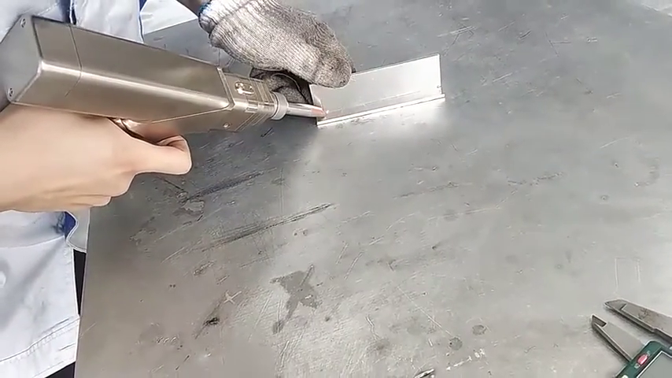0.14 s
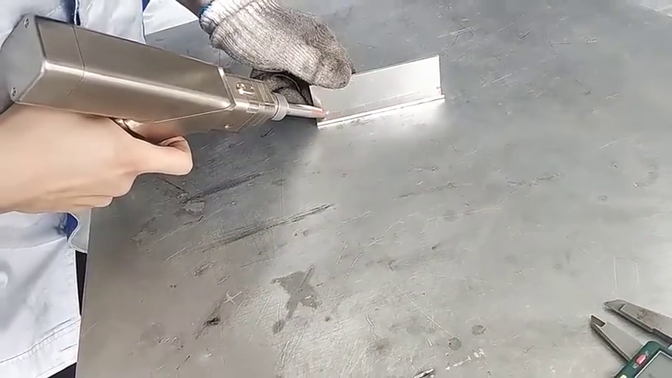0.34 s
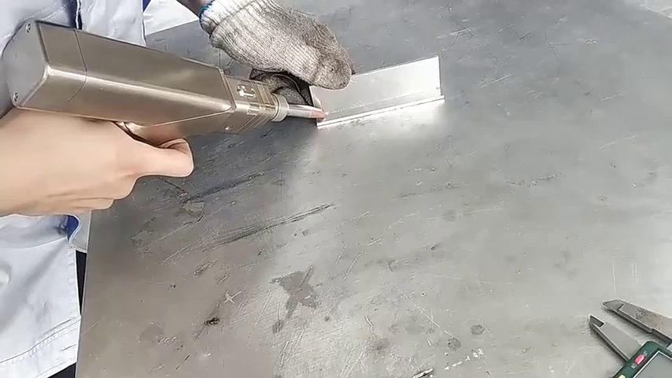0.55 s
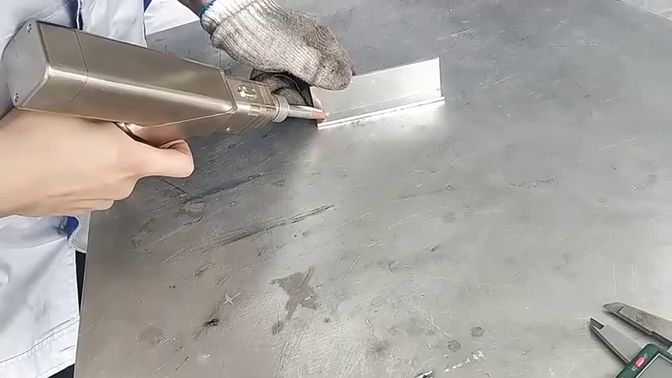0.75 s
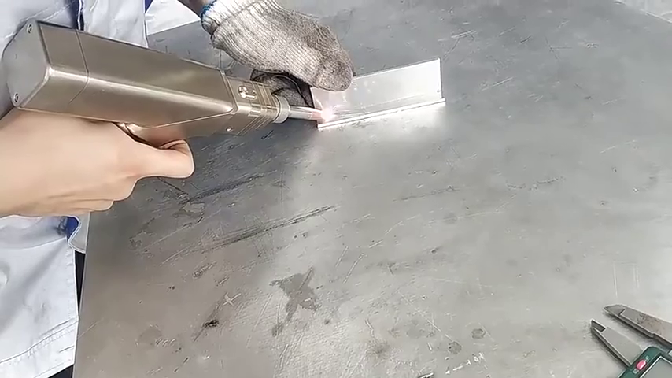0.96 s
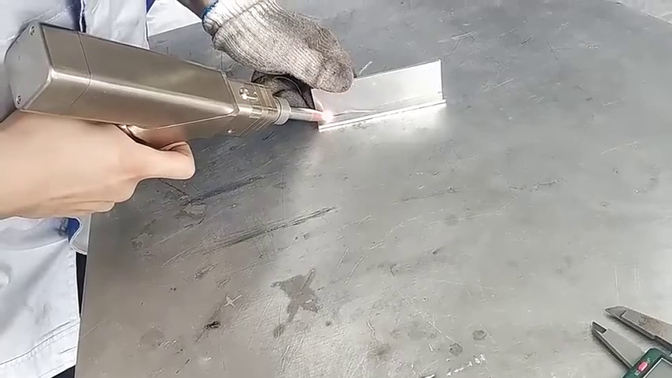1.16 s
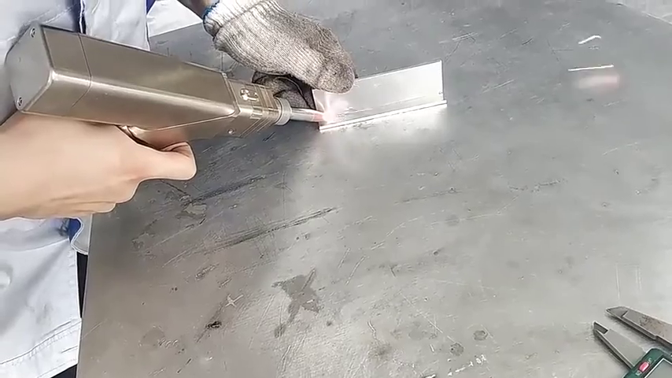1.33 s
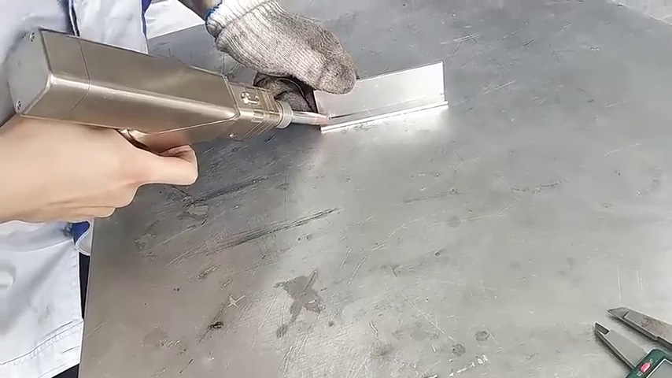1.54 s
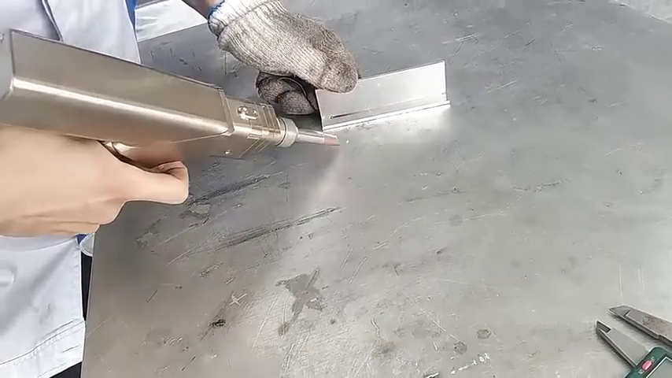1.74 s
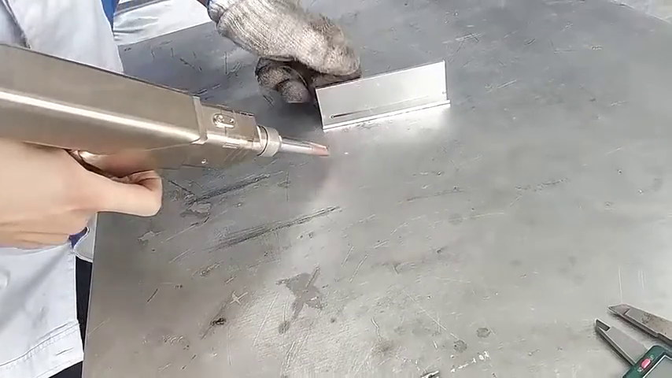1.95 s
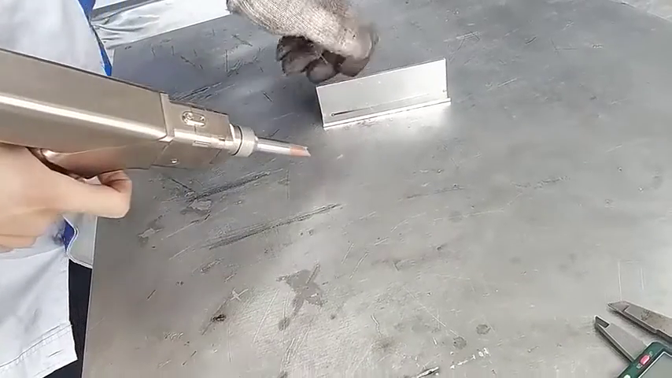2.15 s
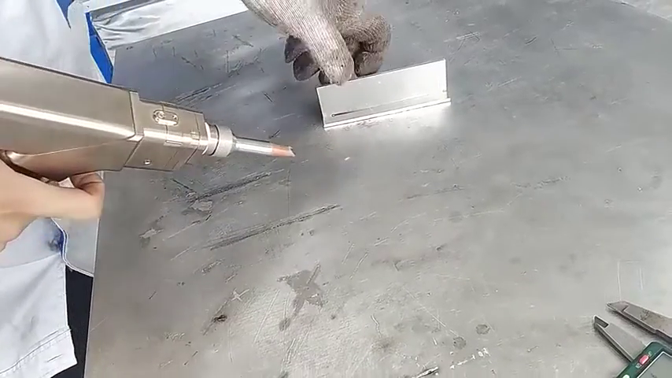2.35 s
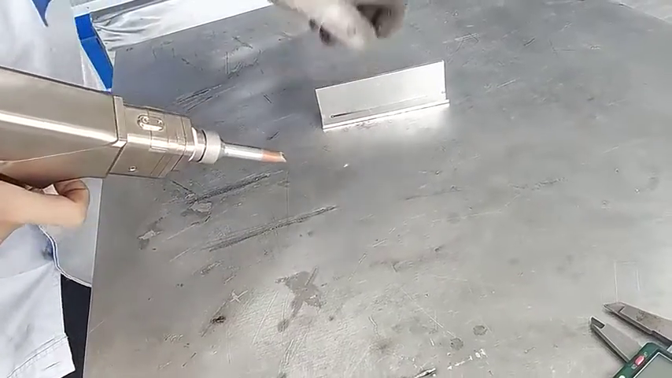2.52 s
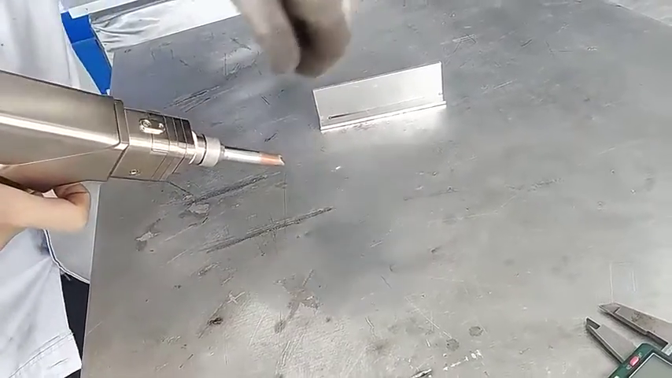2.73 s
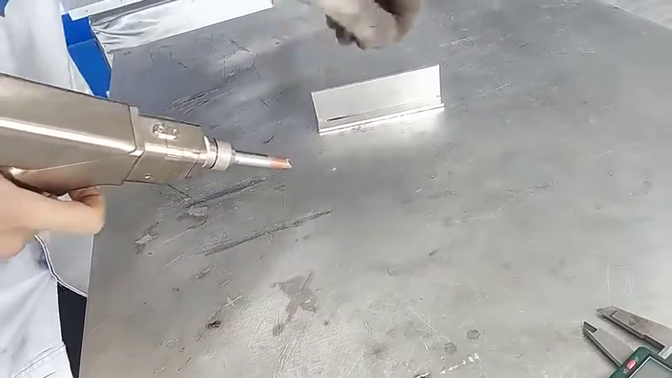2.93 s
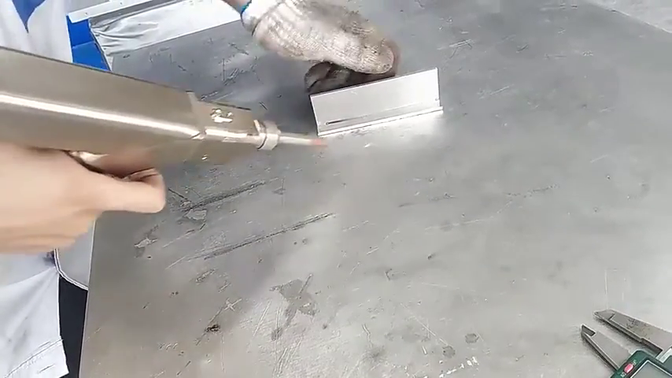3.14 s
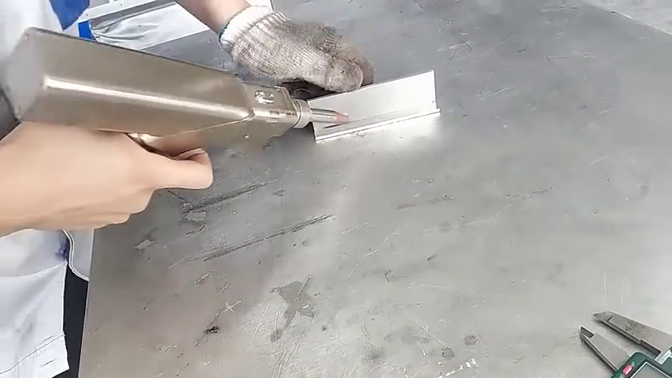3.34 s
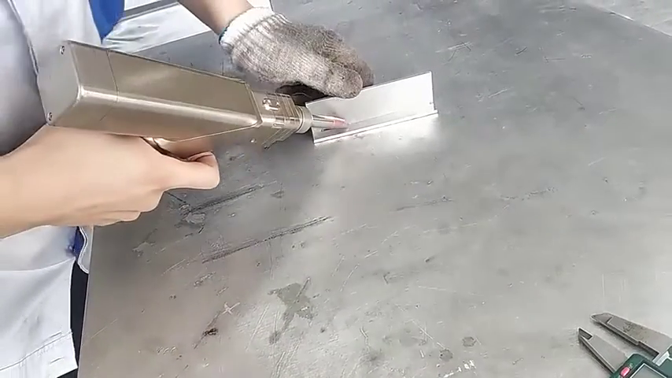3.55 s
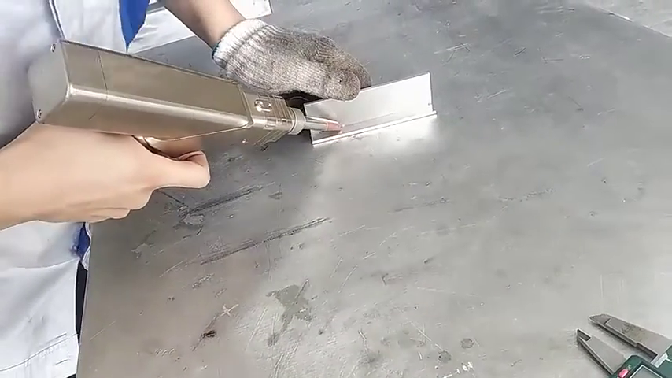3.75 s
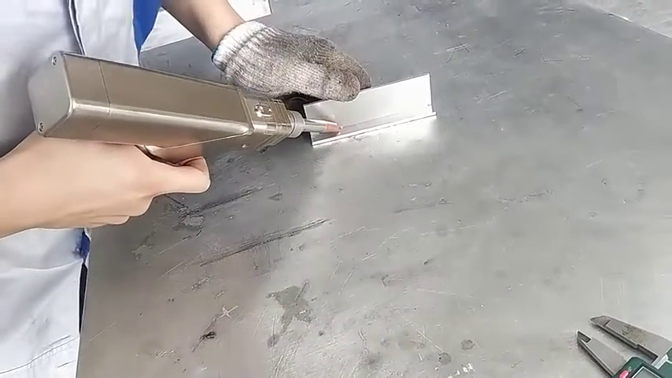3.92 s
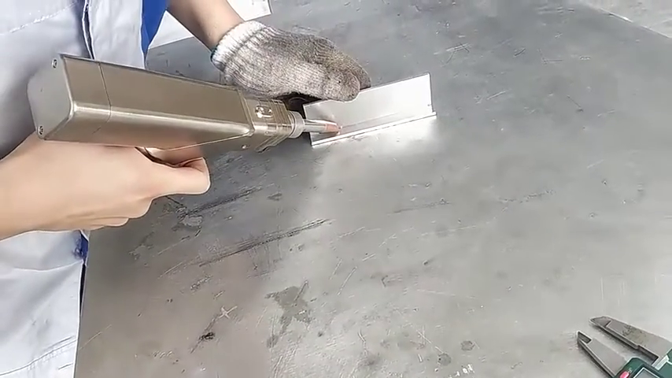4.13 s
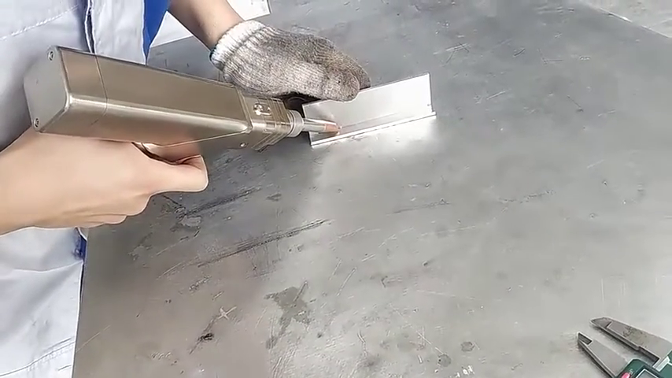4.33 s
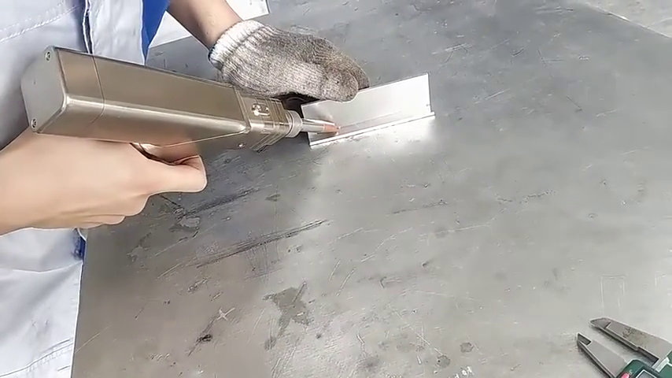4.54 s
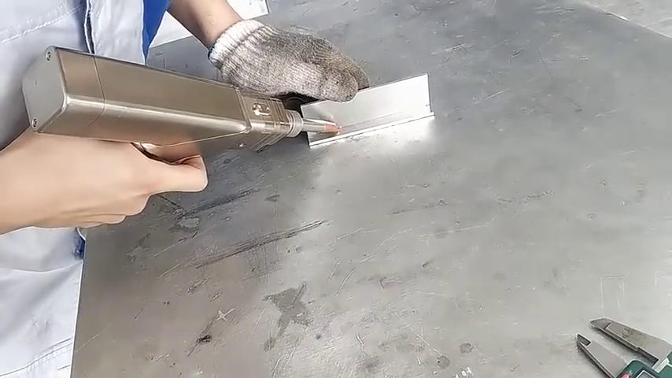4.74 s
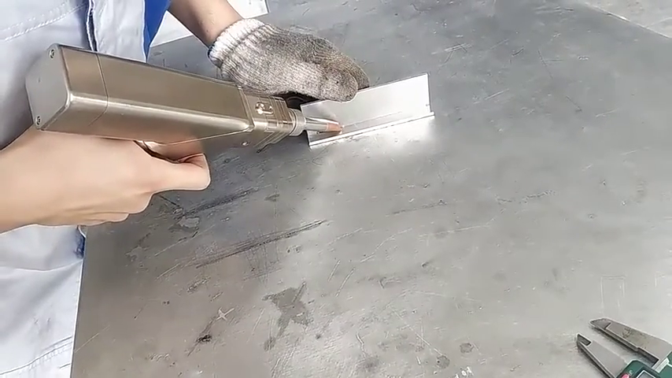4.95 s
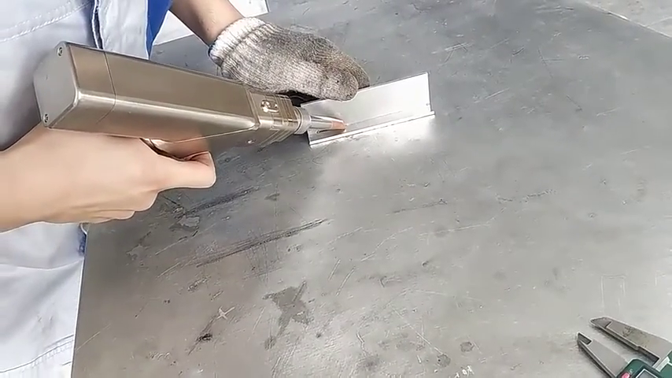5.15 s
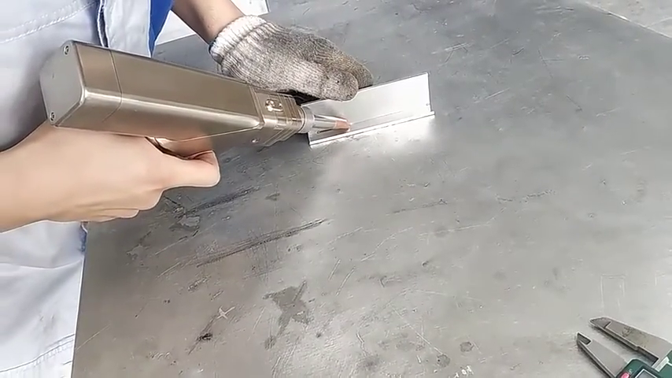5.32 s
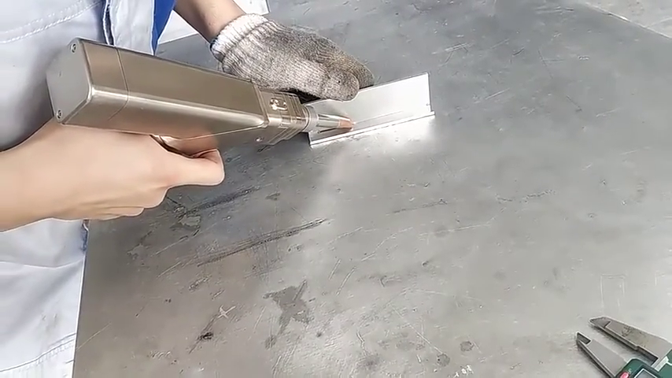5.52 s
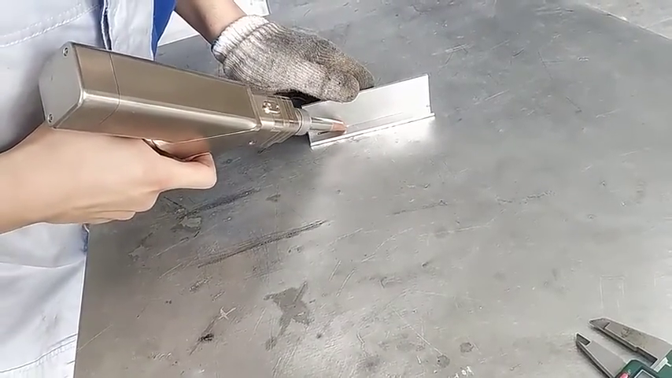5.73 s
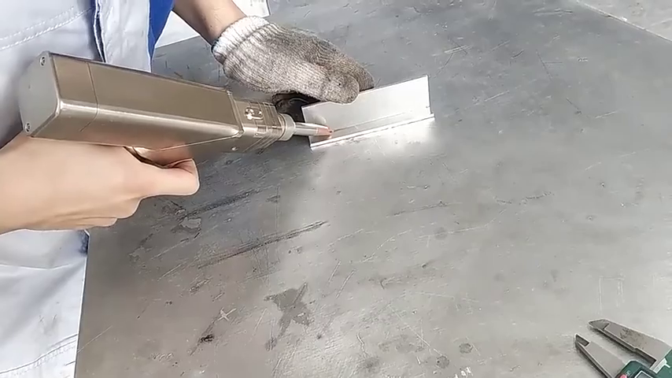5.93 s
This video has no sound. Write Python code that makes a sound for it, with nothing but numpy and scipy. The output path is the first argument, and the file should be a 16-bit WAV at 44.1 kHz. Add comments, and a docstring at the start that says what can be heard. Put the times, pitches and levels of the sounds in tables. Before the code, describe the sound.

Over a steady rumbling fan hum, a grinder rasps lightly, a sharp gas jet hisses briefly with a valve click, then grinding turns firm and choppy.

```python
"""Cooling fans rumble and hum throughout while a grinder further off rasps lightly over metal.
At 0.9 s the shielding gas of a handheld laser welder whistles and roars in a small steel angle, and a valve clicks.
The grinder then skips, knocks the work and goes over to firm strokes. Air, jet and disc are noise shaped by
resonances; hum, click and knocks are sinusoids, with a burst of noise in each knock.
A single microphone hears it all; only the treble flickers between the ears."""
import sys
import numpy as np
from scipy import signal
from scipy.fft import rfft, irfft, next_fast_len
from scipy.io import wavfile
from scipy.ndimage import uniform_filter1d, map_coordinates

SR = 44100
rng = np.random.default_rng(int(sys.argv[2]) if len(sys.argv) > 2 else 0)


def pcm_store(signal):
    """Save signal as 16-bit PCM."""
    levels = np.round(np.clip(np.atleast_2d(signal), -1, 1) * 32767)
    wavfile.write(sys.argv[1], SR, levels.astype(np.int16).T)


def amplitude_ratio(level_db):
    """Convert a level in decibels to the matching linear amplitude (field) ratio."""
    exponent = np.asarray(level_db, float) / 20
    return 10 ** exponent


N = 268128  # samples in the scene


def unit(x):
    """Normalization: a signal divided by its rms has rms 1."""
    return x / np.sqrt(np.mean(x ** 2) + 1e-20)


def along(points, hz):
    """Interpolation over log frequency, since pitch is heard by ratio; points are (Hz, value)."""
    f, v = np.transpose(points)
    return np.interp(np.log(hz + 1), np.log(f + 1), v)


def curves(rows):
    """Piecewise-linear envelopes, one per column after the time; far below hearing outside the rows."""
    s, *cols = np.transpose(rows)
    return [np.interp(np.arange(N) / SR, s, c, left=-120, right=-120) for c in cols]


def held(start, rise, hold, fade_db_per_s):
    """Steady excitation: the gain rises, holds, then decays exponentially for at most a second."""
    t = np.arange(N) / SR - start
    return np.clip(t / rise, 0, 1) * amplitude_ratio(-fade_db_per_s * np.clip(t - rise - hold, 0, 1))


def wobble(rate):
    """Slow random modulation: a smooth curve through random knots, rate knots a second."""
    knots = rng.standard_normal(int(N * rate / SR) + 4)
    return map_coordinates(knots, [np.arange(N) * rate / SR])


def filtered(x, response):
    """Linear filtering: the spectrum times a response of frequency."""
    m = next_fast_len(N + SR // 2)
    return irfft(rfft(x, m) * response(np.fft.rfftfreq(m, 1 / SR)), m)[..., :N]


def patchy(patchy_db):
    """Non-stationary noise: narrow bands ring up briefly, broad and slower patches come and go."""
    z = signal.stft(rng.standard_normal(N + 1024), nperseg=1024)[2]

    def field(tall, long):
        across = uniform_filter1d(rng.standard_normal(z.shape), size=tall, axis=0)
        return unit(uniform_filter1d(across, size=long, axis=1))

    gain_db = patchy_db * field(tall=2, long=5) + 1.1 * field(tall=14, long=7)
    return signal.istft(z * amplitude_ratio(gain_db), nperseg=1024)[1][:N]


def resonant(modes, patchy_db, steep=2):
    """Resonance filtering: noise of rms 1 has passed each resonance twice, so the skirts fall fast."""
    def power(f):
        return sum(amplitude_ratio(db) ** 2 / (1 + ((f * f - c * c) / (w * f + 1)) ** 2) ** steep
                   for c, w, db in modes)

    return unit(filtered(patchy(patchy_db), lambda f: np.sqrt(power(f))))


def gliding(rows, patchy_db):
    """Time-varying resonance: noise of steady rms 1 whose centre and width move."""
    hz, t, z = signal.stft(patchy(patchy_db), SR, nperseg=512)
    s, centre, width = np.transpose(rows)
    c, w, f = np.interp(t, s, centre), np.interp(t, s, width), hz[:, None]

    def bell(wide):
        return 1 / (1 + ((f * f - c * c) / (wide * f + 1)) ** 2) ** 2

    power = bell(w) + amplitude_ratio(-9) ** 2 * bell(c)  # a broad body lies under the resonance
    level = np.sqrt(power / power.mean(axis=0))
    return unit(signal.istft(z * level, SR, nperseg=512)[1][:N])


# Spectrum of the fan air. Each row: frequency in Hz, relative level in dB.
AIR_SPECTRUM = [(35, -48), (60, -11), (134, -12), (190, -4.5), (222, 1.5), (330, -3), (632, -9), (752, -11),
                (1210, -12.5), (1800, -12), (2200, -10), (2840, -9.5), (6510, -13.5), (9020, -11),
                (9850, -9.5), (10300, -36), (10900, -13), (11300, -32)]
# Wavering machine tones. Each row: frequency in Hz, mean level in dB rms.
HUM_TONES = [(199.7, -43.5), (230, -47), (287, -47), (600, -57)]


def fans():
    """Broadband flow noise with tones wavering in amplitude and phase."""
    air = unit(filtered(patchy(patchy_db=3.0), lambda hz: amplitude_ratio(along(AIR_SPECTRUM, hz))))
    t = np.arange(N) / SR
    tones = np.zeros(N)
    for hz, db in HUM_TONES:
        gain = np.sqrt(2) * amplitude_ratio(db + 2.4 * wobble(7))
        tones += gain * np.sin(2 * np.pi * hz * t + 1.15 * wobble(8.1))
    drift_db = .7 * wobble(5) + .5 * wobble(14)
    return amplitude_ratio(-26.5 + drift_db) * air + tones


# Disc leaning lightly on the work. Each row: time in seconds, sizzle in dB, roar in dB.
LIGHT_CONTACT = [(0, -33.5, -53), (.32, -30.5, -36), (.45, -26.5, -26.5), (.62, -31.5, -28.5),
                 (.72, -30.5, -39), (.88, -39, -52), (1.2, -55, -44), (1.47, -29, -27), (1.68, -28.5, -35),
                 (2.1, -31, -34), (2.35, -27, -26.5), (2.6, -25, -28.5), (2.7, -29, -32), (3.08, -30, -29),
                 (3.9, -23.5, -41.5), (3.99, -49, -38), (4.1, -28, -42), (5.2, -36.5, -33), (5.5, -29, -26),
                 (5.61, -30, -32), (5.7, -37, -44), (5.87, -31, -35.5), (6.08, -28.5, -30.5)]
# Firm strokes. Each row: contact in seconds, hold in seconds, sizzle in dB, roar in dB,
# share of the roar in the upper resonances from 0 to 1.
FIRM_STROKES = [(3.098, 0.24, -26.5, -28, 0.07), (3.333, 0.14, -24.5, -27, 0.53),
                (3.577, 0.095, -20.5, -22.5, 0.6), (3.794, 0.066, -24.5, -26, 0.27),
                (4.005, 0.02, -26, -32.5, .4), (4.075, 0.056, -19.5, -23, 0.7),
                (4.275, 0.19, -24, -27.5, 0.6), (4.539, 0.18, -26.5, -27.5, 0.5),
                (4.927, 0.14, -28.5, -33.5, 0.06), (5.253, 0.076, -24, -29.5, 0.3),
                (5.377, 0.046, -29, -33.5, 0.7)]


def contact():
    """Energy addition: light contact and strokes sum in power; returns sizzle, roar, upper roar."""
    sizzle, thrust = amplitude_ratio(curves(LIGHT_CONTACT)) ** 2
    weight = thrust * 0.6  # share of the light roar in the upper resonances
    for s, hold, sizzle_db, roar_db, share in FIRM_STROKES:
        press = held(s, rise=0.018, hold=hold, fade_db_per_s=106) ** 2
        sizzle = sizzle + amplitude_ratio(sizzle_db) ** 2 * press
        thrust = thrust + amplitude_ratio(roar_db) ** 2 * press
        weight = weight + amplitude_ratio(roar_db) ** 2 * press * share
    return sizzle, thrust, weight


# Disc bites. Each row: start in seconds, sizzle in dB, roar in dB,
# time to the peak in seconds (at least 0.004 is played).
DISC_BITES = [(.48, -25.5, -30, 0.0089), (1.739, -21.5, -25.5, 0.013), (1.831, -25, -27.5, 0.025),
              (1.901, -24, -22, 0.0092), (2.391, -21, -27, 0.02), (2.494, -22, -21.5, 0.011),
              (2.561, -24, -21, 0.012), (2.736, -20.5, -30, 0.0092), (2.774, -19.5, -26, 0.0068),
              (2.808, -19, -24, 0.0086), (2.859, -23, -26.5, .01), (3.123, -29, -23, .01),
              (3.159, -23, -29, 0.012), (3.19, -21, -24, 0.01), (3.238, -22.5, -23.5, 0.0065),
              (3.372, -21.5, -31, 0.013), (3.484, -19, -33, .006), (3.569, -21, -19.5, 0.0063),
              (3.83, -20, -31, 0.015), (3.918, -22.5, -24.5, 0.0086), (4.016, -28, -33, .007),
              (4.172, -16.5, -34, 0.0055), (4.323, -23, -32, .008), (4.358, -19, -24, 0.009),
              (4.39, -19, -30, .008), (4.425, -17, -34, 0.0045), (4.55, -27, -32, .008),
              (4.606, -20.5, -25, 0.0055), (4.642, -20, -26, 0.011), (4.679, -20, -27.5, .011),
              (4.722, -20, -22, 0.0074), (4.767, -19, -22.5, 0.0099), (4.96, -21.5, -26.5, 0.0053),
              (4.998, -20.5, -26, 0.006), (5.03, -20, -28, 0.0072), (5.067, -16.5, -40, 0.0074),
              (5.114, -23, -35, .008), (5.291, -29, -36, 0.0038), (5.335, -24, -27, 0.0088)]


def bites():
    """Impulsive excitation: as the disc skips it bites in short bursts; returns sizzle and roar power."""
    t, power = np.arange(SR // 4) / SR, np.zeros((2, N + SR))
    for s, db, thrust_db, length in DISC_BITES:
        u = t / max(length, .004)
        swell = (u * np.exp(1 - u)) ** 2  # quick contact, slower release
        power[:, round(s * SR):][:, :len(t)] += amplitude_ratio([[db], [thrust_db]]) ** 2 * swell
    return power[:, :N]


# Fixed sizzle resonances. Each row: centre in Hz, width in Hz, relative level in dB.
DISC_MODES = [(6000, 4700, -5), (8400, 1200, -0.5), (9060, 1000, 4.5), (10000, 400, -24)]
# Brightest sizzle band, drifting with the angle of the disc.
# Each row: time in seconds, centre in Hz, width in Hz.
DISC_EDGE = [(1.5, 7800, 1200), (1.54, 8490, 1200), (1.7, 8740, 1200), (1.74, 7630, 1200),
             (1.84, 9000, 1200), (1.91, 8020, 1200), (2.06, 8830, 1200), (2.35, 8760, 1200),
             (2.39, 8130, 1200), (2.56, 8700, 1200), (2.9, 8360, 1200), (2.98, 9090, 1200),
             (3.12, 8510, 1200), (3.41, 8740, 1200), (3.45, 8050, 1200), (3.49, 8900, 1200),
             (3.68, 7900, 1200), (3.78, 9100, 1200), (3.94, 7800, 1200), (4.29, 8800, 1200),
             (4.83, 8350, 1200), (4.98, 9060, 1200), (5.1, 8260, 1200), (5.31, 9200, 1200),
             (5.45, 8600, 1200), (6.08, 8890, 1200)]
# Sizzle of a bite. Each row: centre in Hz, width in Hz, relative level in dB.
BITE_MODES = [(6910, 1500, 1.5), (7520, 1000, 3.5), (8530, 1900, 2.5), (9400, 840, 4)]


def rasp(sizzle, bite):
    """Abrasive friction noise: disc resonances weighted by the root of the two powers."""
    steady = unit(resonant(DISC_MODES, patchy_db=6.0) + amplitude_ratio(0.5) * gliding(DISC_EDGE, patchy_db=7.0))
    return np.sqrt(sizzle) * steady + np.sqrt(bite) * resonant(BITE_MODES, patchy_db=3.5)


# Lower resonance of the work, following the spot under the disc.
# Each row: time in seconds, centre in Hz, width in Hz.
CONTACT_SPOT = [(0, 2900, 2000), (1.95, 2740, 1800), (2.35, 3020, 1900), (2.6, 2590, 1800),
                (2.8, 3100, 1400), (3.12, 2600, 2620), (3.18, 3130, 2400), (3.24, 2700, 1500),
                (3.3, 3060, 1900), (3.48, 3560, 1400), (3.57, 2660, 2620), (3.75, 2580, 1700),
                (3.81, 3000, 800), (3.87, 2930, 600), (3.92, 2650, 900), (3.98, 2450, 1000),
                (4.1, 2560, 1500), (4.3, 2860, 1500), (4.4, 3400, 2200), (4.55, 2980, 1500),
                (4.78, 2700, 1400), (5, 2660, 1400), (5.25, 2970, 1500), (5.33, 3560, 1500),
                (5.45, 3300, 2000), (5.55, 2910, 1500), (6.08, 2620, 1400)]
# Upper resonances of the work. Each row: centre in Hz, width in Hz, relative level in dB.
WORK_MODES = [(3520, 4400, -0.5), (5180, 1400, -0.5)]


def workpiece(thrust, upper):
    """Modal excitation: where the disc touches decides how power divides between the resonances."""
    low, high = gliding(CONTACT_SPOT, patchy_db=3), resonant(WORK_MODES, patchy_db=3)
    return np.sqrt(thrust * (1 - upper)) * low + np.sqrt(thrust * upper) * high


def grinder():
    """Friction-driven vibration: disc rasp and workpiece roar share the modulation of uneven abrasive."""
    sizzle, thrust, weight = contact()
    upper = np.clip(weight / thrust, 0, 1)
    bite, bite_thrust = bites()
    grit = amplitude_ratio(0.64 * wobble(160) + 0.59 * wobble(24.02))
    return grit * (rasp(sizzle, bite) + workpiece(thrust + bite_thrust, upper))


# Whistle in the nozzle. Each row: centre in Hz, width in Hz, relative level in dB.
NOZZLE_MODES = [(7630, 290, 0), (8700, 230, -6), (9040, 3400, -3), (9540, 370, 5.5), (10150, 450, 1.5),
                (11050, 400, 1)]
# Roar in the steel angle. Each row: centre in Hz, width in Hz, relative level in dB.
CORNER_MODES = [(4200, 260, -3), (4660, 3600, -8), (5040, 260, -2), (5670, 410, -2.5), (7360, 210, 0.5)]
# Lowest tone of the angle. Each row: centre in Hz, width in Hz, relative level in dB.
DRONE_MODES = [(2170, 330, 0)]


def gas_jet():
    """Jet noise exciting resonances: a fluttering whistle stops first, the corner roar trails off."""
    open_s, rise_s = 0.9, 0.011
    whistle = amplitude_ratio(-18.5) * held(open_s, rise_s, hold=.565, fade_db_per_s=400)
    roar = held(open_s, rise_s, hold=0.64, fade_db_per_s=58)
    since = np.clip(np.arange(N) / SR - open_s, 0, None)
    surge_db = 6 * np.exp(-since / 0.082)  # extra roar as the pressure is let go
    jet = whistle * amplitude_ratio(1.6 * wobble(90.4)) * resonant(NOZZLE_MODES, patchy_db=3.0)
    jet += roar * amplitude_ratio(-29 + surge_db) * resonant(CORNER_MODES, patchy_db=3.0)
    drone_db = -33.5 - 4 * since  # strongest at first
    return jet + roar * amplitude_ratio(drone_db) * resonant(DRONE_MODES, patchy_db=1.5)


# Valve clicks. Each row: start in seconds, gain in dB.
VALVE_CLICKS = [(.9301, -16)]
# Ringing of the valve. Each row: frequency in Hz, relative level in dB, 60 dB decay time in seconds.
VALVE_RINGING = [(290, -2, .05), (620, -1, .014), (950, 1, .016), (1400, -3, .008), (2230, 5.5, .022),
                 (2900, -1, .007), (3600, 0, .007), (4250, 3, .009), (5600, 3, .01)]


def valve():
    """Modal impact: the snap is a sum of exponentially damped sinusoids."""
    out, t = np.zeros(N), np.arange(SR // 10) / SR
    for s, db in VALVE_CLICKS:
        snap = sum(amplitude_ratio(level - 60 * t / t60) * np.sin(2 * np.pi * hz * t)
                   for hz, level, t60 in VALVE_RINGING)
        thump = uniform_filter1d(np.pad(snap, 200), size=201)[200:-200]  # below the lowest mode
        out[round(s * SR):][:len(t)] -= amplitude_ratio(db) * (snap - thump)
    return out


def welder():
    """Superposition of the gas jet and the valve."""
    return gas_jet() + valve()


# The disc knocks the work. Each row: start in seconds, gain in dB, treble tilt in dB at 7500 Hz.
KNOCKS = [(1.744, -18.5, -3), (1.751, -24, 9), (1.9056, -22, 2)]
# Ringing of the work. Each row: frequency in Hz, mean relative level in dB,
# 60 dB decay time in seconds.
KNOCK_RINGING = [(700, -10, .03), (1220, -6, .05), (2220, -10, .04), (2700, 0, .07), (4500, -7, .05),
                 (7490, 0, .09)]


def clinks():
    """Modal impact: a crack of noise, and damped modes of random level and phase."""
    out, t = np.zeros(N), np.arange(SR // 10) / SR
    for s, db, treble_db in KNOCKS:
        ring = np.zeros(len(t))
        for hz, level, t60 in KNOCK_RINGING:
            mode_db = level + treble_db * hz / 7500 + rng.normal(0, 2)
            ring += amplitude_ratio(mode_db - 60 * t / t60) * np.sin(2 * np.pi * (hz * t + rng.random()))
        crack = amplitude_ratio(3 - 60 * t / 0.0086) * rng.standard_normal(len(t))
        out[round(s * SR):][:len(t)] += amplitude_ratio(db) * (ring * (1 - np.exp(-t / 0.0012)) + crack)
    return out


# Decay of the workshop. Each row: frequency in Hz, 60 dB decay time in seconds.
HALL_DECAY = [(200, 0.88), (3000, 0.15), (10000, 0.24)]


def hall(x):
    """Diffuse reverberation: convolution with noise that decays at its own speed in each band."""
    hz, t, z = signal.stft(rng.standard_normal(SR // 2), SR, nperseg=256)
    tail = signal.istft(z * amplitude_ratio(-60 * t / along(HALL_DECAY, hz)[:, None]), SR, nperseg=256)[1]
    delayed = np.pad(x, (700, 0))  # samples before the first answer
    return signal.fftconvolve(delayed, tail / np.linalg.norm(tail))[:N]


def scene():
    """Direct and reverberant sound: the far grinder excites the hall more strongly than the near welder."""
    near, far = welder(), grinder() + clinks()
    mono = near + far + hall(amplitude_ratio(-32) * near + amplitude_ratio(-12.5) * far) + fans()
    return np.array([mono, mono])


# Treble flicker. Each row: frequency in Hz, strength from 0 to 1 that sets how often patches occur.
FLICKER_STRENGTH = [(3800, 0), (5000, .08), (6500, .22), (8500, .33), (9600, .25), (10500, 0)]


def flicker(mono):
    """Interaural decorrelation: short treble patches of random phase and nearly the sound's own level."""
    hz, t, z = signal.stft(mono, SR, nperseg=2048, noverlap=1024)
    band, frame = (hz // 700).astype(int), np.arange(len(t))
    luck = rng.random((band.max() + 2, len(t) // 2 + 1))
    # neighbouring bands tend to go together
    luck = .3 * (luck[1:] + luck[:-1]) + .4 * rng.random(len(t) // 2 + 1)
    chance = .75 * along(FLICKER_STRENGTH, band * 700 + 350)[:, None] ** .4
    on = luck[band][:, frame // 2] < chance
    scrambled = z * np.exp(2j * np.pi * rng.random(z.shape))
    other = scrambled * on * (1 - frame % 2)  # alternate frames: each patch swells and fades
    return amplitude_ratio(-.5) * signal.istft(other, SR, nperseg=2048, noverlap=1024)[1][:N]


def band_limit(x):
    """A steep low-pass at the top of the band."""
    return signal.sosfilt(signal.butter(12, 11130, fs=SR, output="sos"), x)


# Range of the microphone. Each row: frequency in Hz, response in dB.
MIC_RESPONSE = [(30, -37), (100, -14), (170, -2), (9000, -2), (10200, -3), (10650, -12), (11300, -40)]


def record(dry):
    """Band-limited pickup: microphone roll-off, then treble patches of opposite sign in the two ears."""
    heard = filtered(dry, lambda hz: amplitude_ratio(along(MIC_RESPONSE, hz)))
    mix = heard + flicker(heard[0]) * [[1], [-1]]
    return band_limit(mix)


dry = scene()
out = record(dry)
pcm_store(out)
```